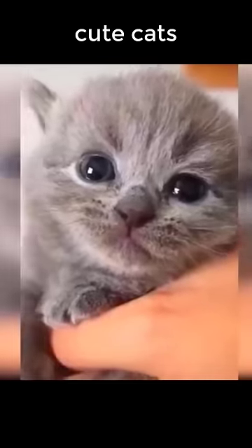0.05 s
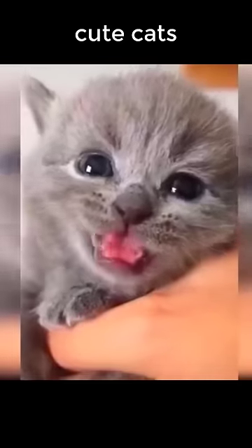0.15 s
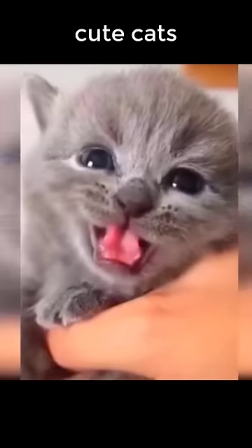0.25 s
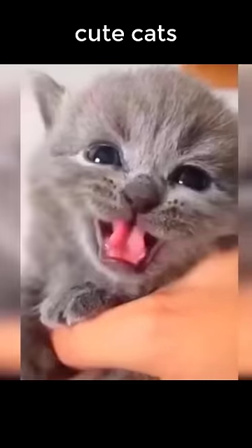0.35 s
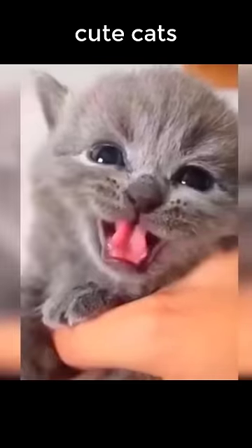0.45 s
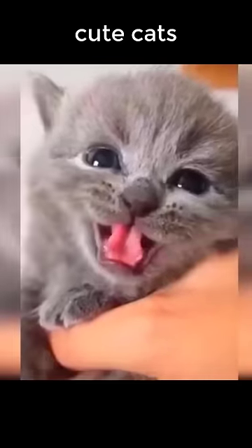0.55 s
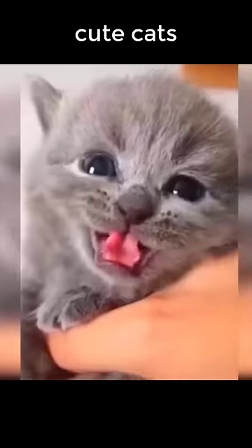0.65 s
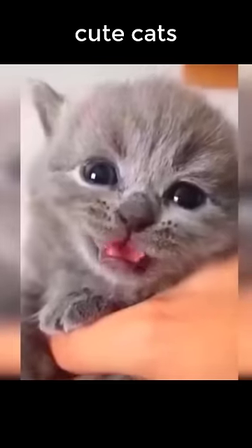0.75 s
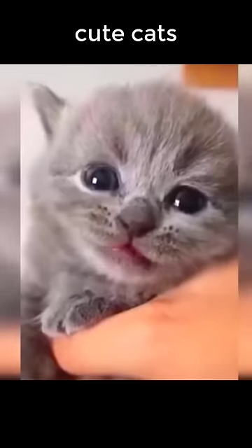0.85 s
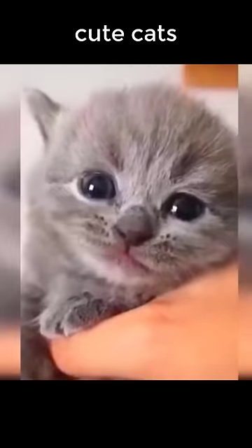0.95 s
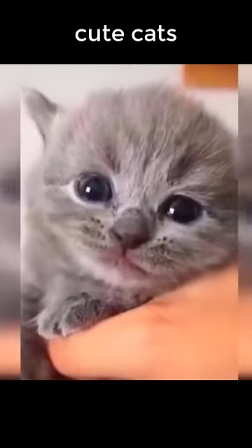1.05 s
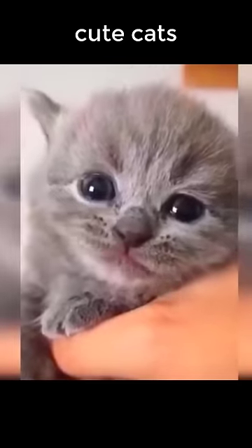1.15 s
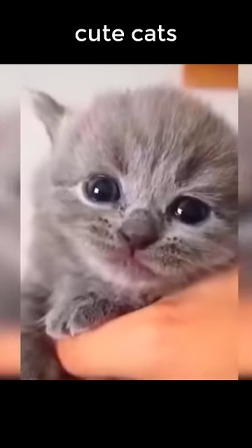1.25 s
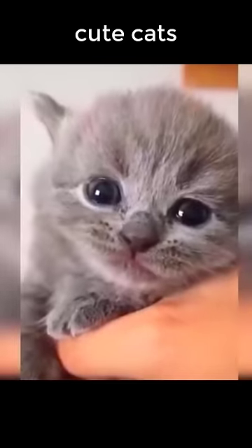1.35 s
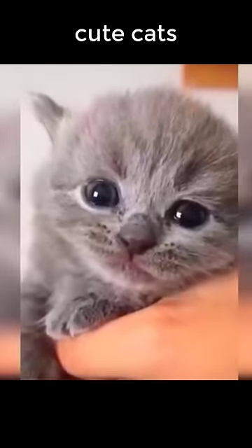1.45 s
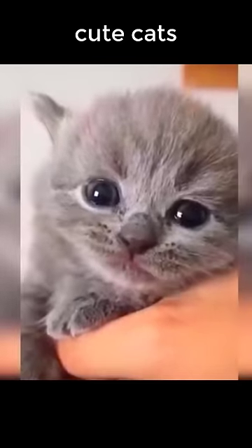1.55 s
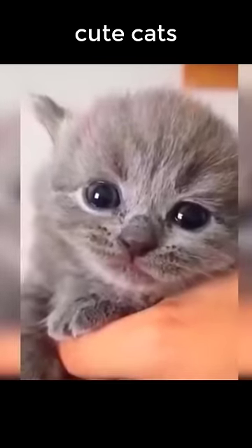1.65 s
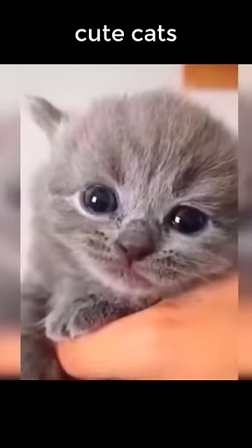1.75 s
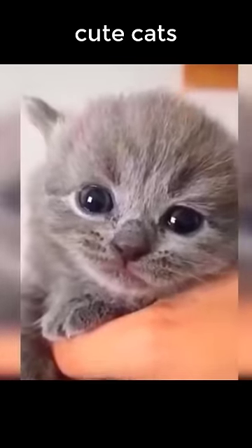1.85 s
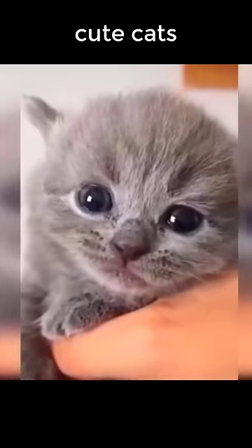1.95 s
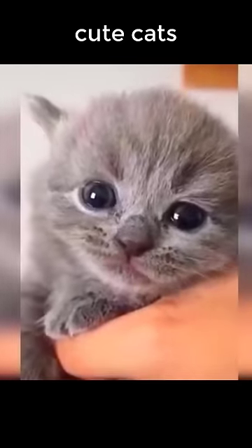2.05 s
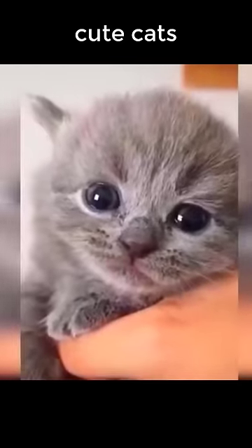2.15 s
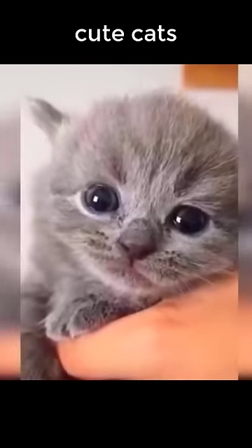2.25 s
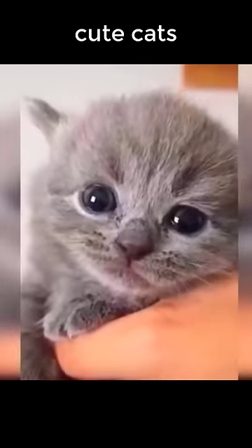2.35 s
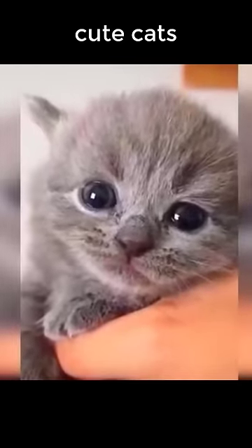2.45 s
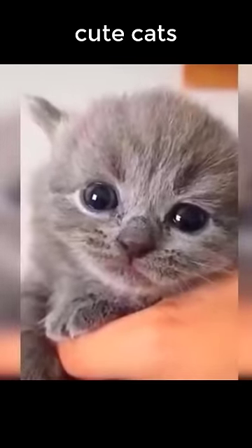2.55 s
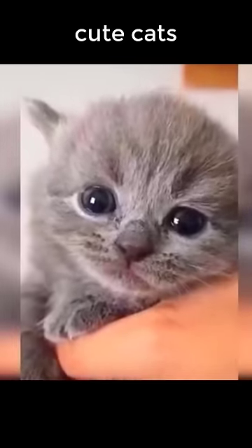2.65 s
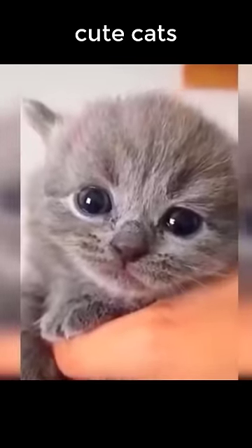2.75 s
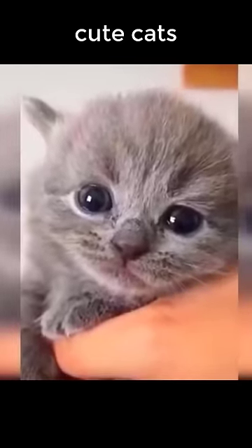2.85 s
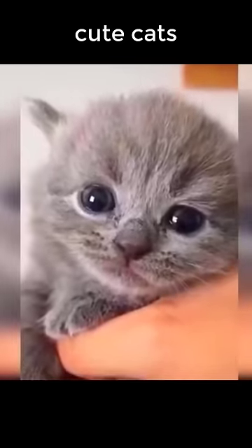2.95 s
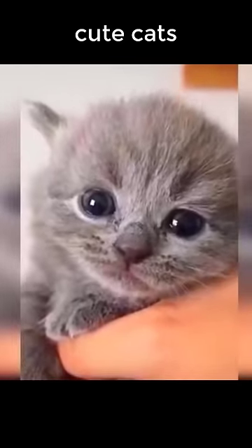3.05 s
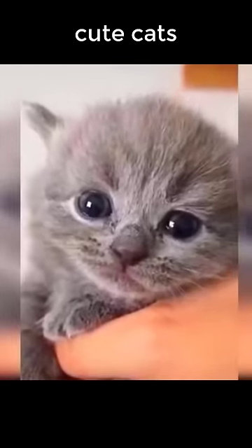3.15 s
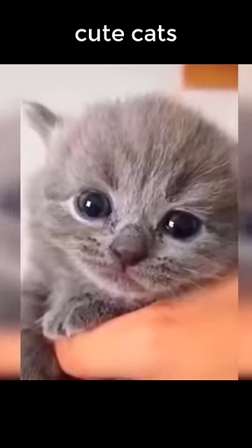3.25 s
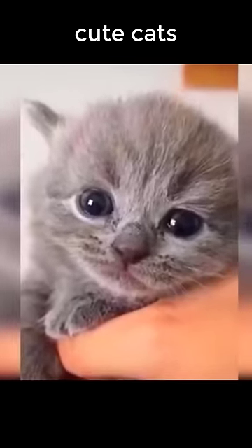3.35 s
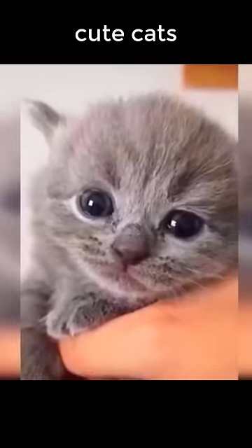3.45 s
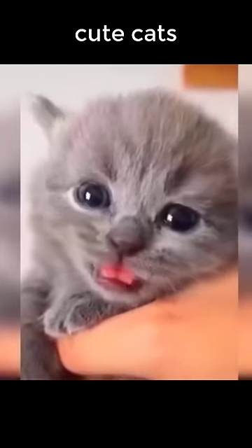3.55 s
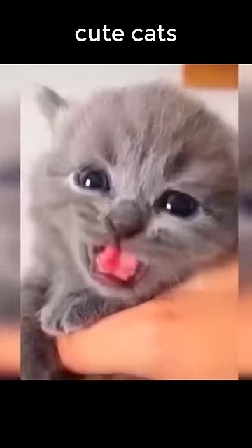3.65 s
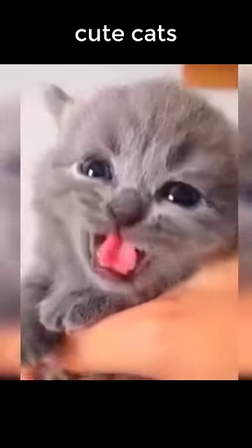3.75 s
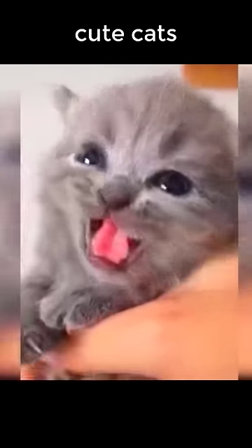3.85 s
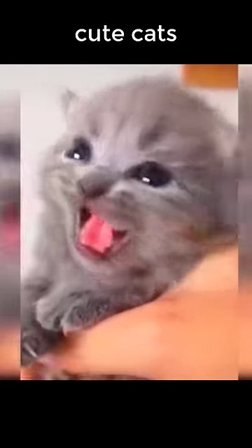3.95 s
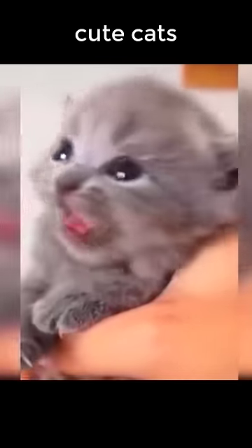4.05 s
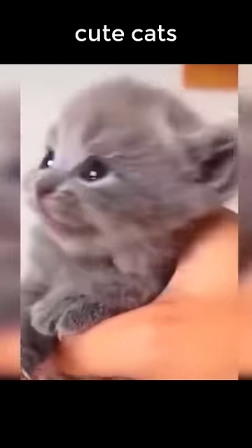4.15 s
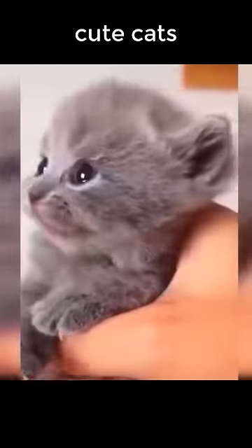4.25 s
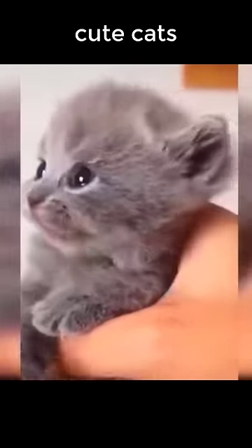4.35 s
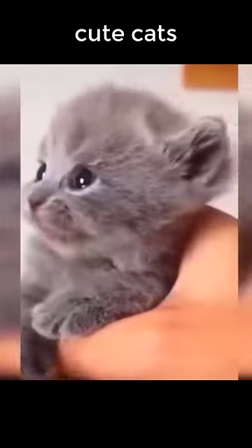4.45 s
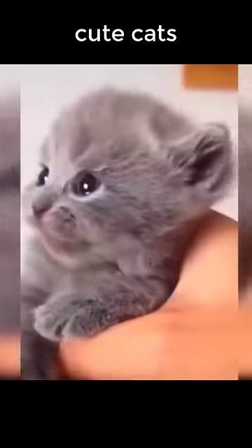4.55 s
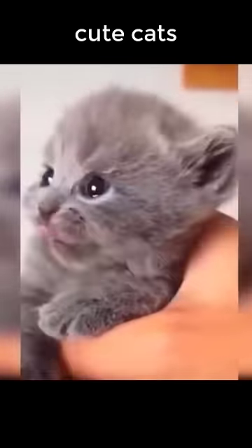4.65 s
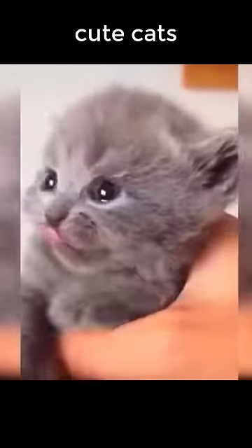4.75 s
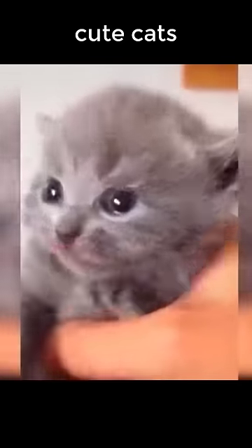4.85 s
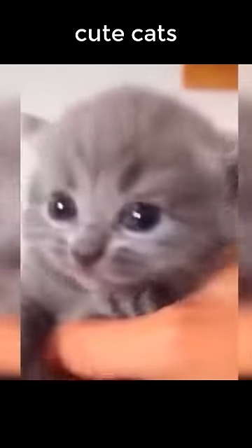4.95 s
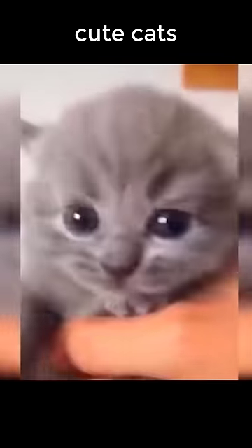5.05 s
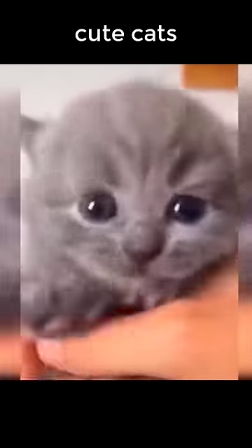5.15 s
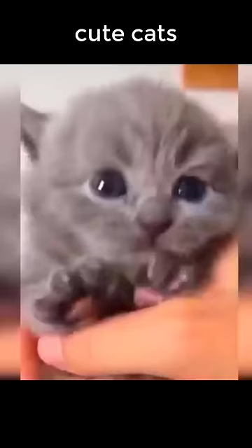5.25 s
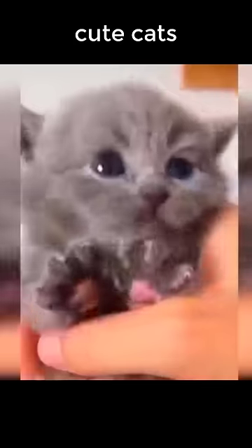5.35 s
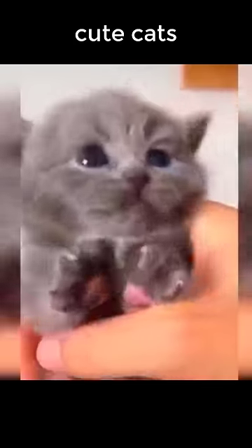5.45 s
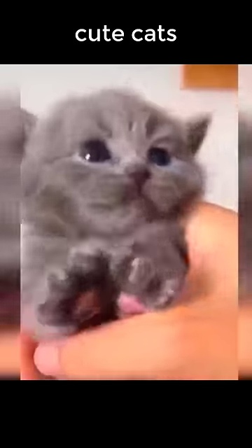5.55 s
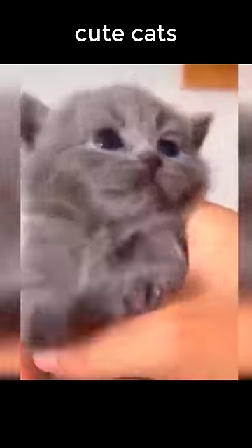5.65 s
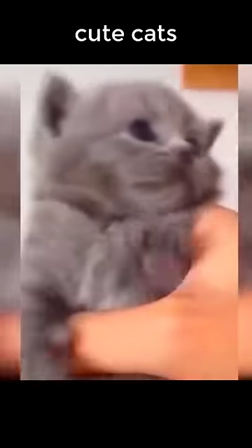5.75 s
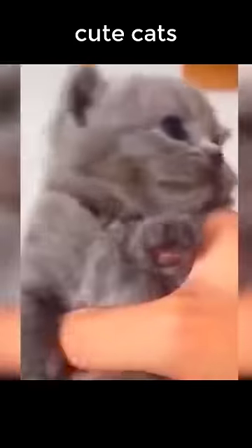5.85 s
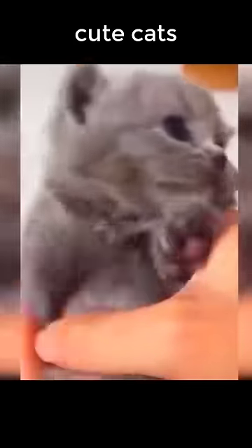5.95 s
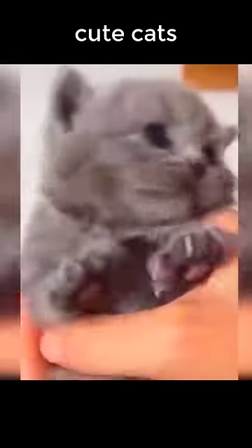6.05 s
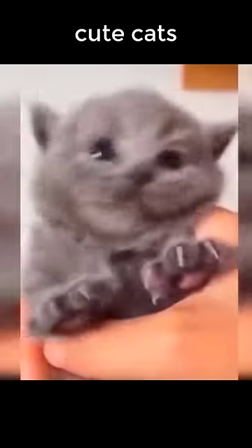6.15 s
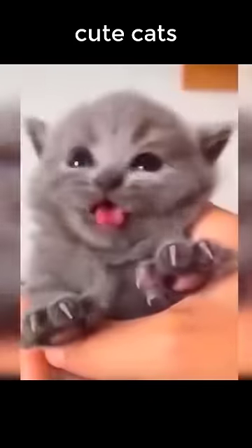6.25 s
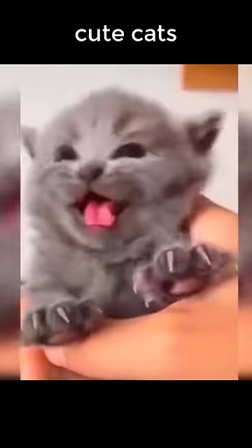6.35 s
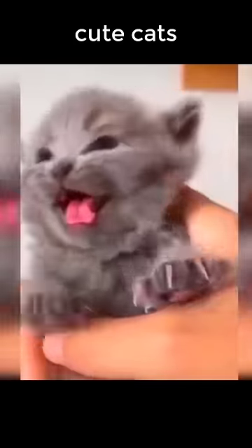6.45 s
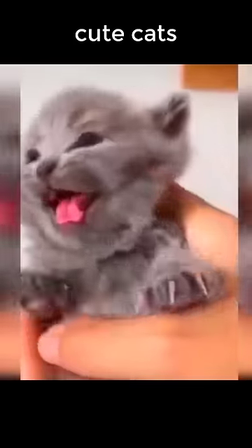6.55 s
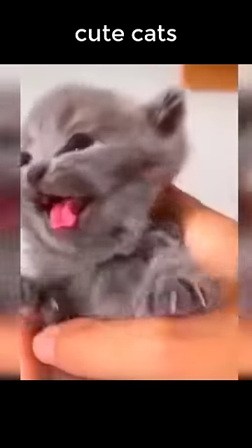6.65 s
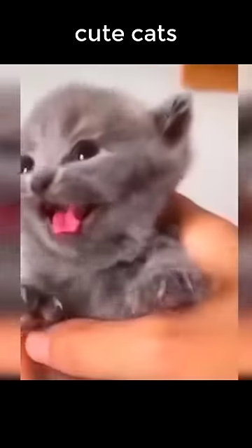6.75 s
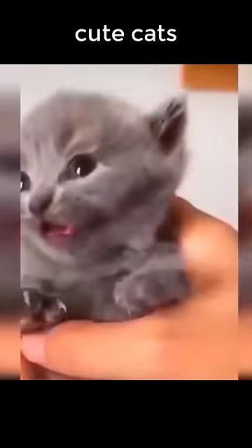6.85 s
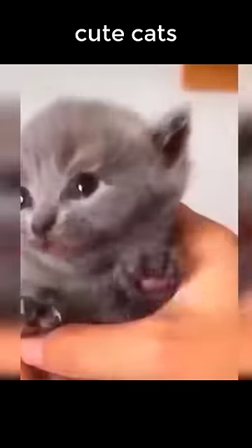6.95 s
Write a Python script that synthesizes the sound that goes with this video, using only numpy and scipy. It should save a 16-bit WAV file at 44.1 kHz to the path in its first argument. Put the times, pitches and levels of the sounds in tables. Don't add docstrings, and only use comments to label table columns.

```python
import sys
import numpy as np
from scipy import signal
from scipy.fft import rfft, irfft, next_fast_len
from scipy.io import wavfile
from scipy.ndimage import uniform_filter1d, minimum_filter1d, map_coordinates

SR = 44100
rng = np.random.default_rng(int(sys.argv[2]) if len(sys.argv) > 2 else 0)


def inscribe(sig):
    pcm = np.round(np.clip(np.atleast_2d(sig).T, -1, 1) * 32767)
    wavfile.write(sys.argv[1], SR, pcm.astype(np.int16))


def gain_from_db(level_db):
    decades = np.asarray(level_db, float) / 20
    return 10 ** decades


N = 308460
T = np.arange(N) / SR
TOP_HZ = 13180


def unit(x):
    return x / np.sqrt(np.mean(x ** 2) + 1e-20)


def along(points, hz):
    f, v = np.transpose(points)
    return np.interp(np.log(hz + 1), np.log(f + 1), v)


def curves(rows, outside=-120):
    s, *cols = np.transpose(rows)
    return [np.interp(T, s, c, outside, outside) for c in cols]


def wobble(rate):
    return map_coordinates(rng.standard_normal(int(N * rate / SR) + 4), [T * rate])


def swell(s, rise, hold, t60):
    return np.clip((T - s) / rise, 0, 1) * gain_from_db(-60 * np.clip(T - s - rise - hold, 0, 2) / t60)


def filtered(x, response):
    m = next_fast_len(len(x) + SR // 2)
    return irfft(rfft(x, m) * response(np.fft.rfftfreq(m, 1 / SR)), m)[:len(x)]


def modes(peaks):
    def response(f):
        total = 0
        for k, (centre, width, db) in enumerate(peaks):
            ring = 1j * f * width / (centre * centre - f * f + 1j * f * width)
            total = total + (-1) ** k * gain_from_db(db) * ring
        return total
    return response


def hiss(spectrum):
    return unit(filtered(rng.standard_normal(N), lambda hz: gain_from_db(along(spectrum, hz))))


def patches(shape, bins, frames):
    field = uniform_filter1d(rng.standard_normal(shape), size=bins, axis=0)
    return unit(uniform_filter1d(field, size=frames, axis=1))


def mottled(x, patchy_db):
    hz, _, z = signal.stft(x, SR, nperseg=512)
    depth_db = patchy_db * np.clip(hz / 6000, .3, 1)[:, None]
    return signal.istft(z * gain_from_db(depth_db * patches(z.shape, 8, 12)), nperseg=512)[1][:N]


# f/Hz, level/dB
HUM = [(53.8, -73), (86.1, -64), (129.2, -76), (172.3, -67.5), (328.4, -68.5), (387.6, -67.5),
       (522.2, -71.5), (775.2, -84.5), (985.1, -72.5), (1642, -79)]
# t/s, rise/s, hold/s, f/Hz, level/dB
WHINE = (2.3, .4, .42, 1642, -70.5)
# f/Hz, level/dB per Hz
RUMBLE = [(30, -22), (55, 11.5), (100, 4.5), (165, 12.5), (255, 5), (340, 8), (480, -14), (750, -74)]
# f/Hz, level/dB per Hz
AIR = [(250, -18), (450, -10.5), (950, -14), (1600, -20), (3500, -19), (5000, -26), (8000, -36.5),
       (13000, -45.5)]


def room_tone():
    out = np.zeros(N)
    for hz, db in HUM:
        tone = np.sin(2 * np.pi * hz * T + 1.02 * wobble(6.8))
        out += np.sqrt(2) * gain_from_db(db + 1.77 * wobble(7)) * tone
    s, rise, hold, hz, db = WHINE
    whine = np.sin(2 * np.pi * hz * T + 1.9 * wobble(16))
    out += gain_from_db(db + 0.92 * wobble(8.8)) * swell(s, rise, hold, 0.24) * whine
    out += gain_from_db(-59.5 + 0.53 * wobble(4.15)) * hiss(RUMBLE)
    return out + gain_from_db(-61.5 + 0.33 * wobble(1.7)) * mottled(hiss(AIR), patchy_db=2.1)


# f/Hz, t60/s
WALLS = [(500, 0.92), (2500, 0.56), (6000, 0.64), (12000, 0.61)]


def walls(x):
    hz, t, z = signal.stft(rng.standard_normal(SR // 2), SR, nperseg=256)
    tail = signal.istft(z * gain_from_db(-60 * t / along(WALLS, hz)[:, None]), SR, nperseg=256)[1]
    late = np.pad(x, (300, 0))
    return signal.fftconvolve(late, tail / np.linalg.norm(tail))[:N]


# t/s, level/dB
BRUSH = [
    (1.7, -72),
    (1.718, -54),
    (1.76, -45),
    (1.984, -77),
    (2.0, -81),
]
# f/Hz, level/dB per Hz
CLOTH = [(1180, -50), (2300, -11), (3100, 1), (3770, -5), (6280, 3), (7000, -3), (10400, 0.5),
         (13000, -3.5)]


def cloth():
    return gain_from_db(curves(BRUSH)[0] + 1.0 * wobble(70)) * mottled(hiss(CLOTH), patchy_db=2.5)


# t/s, t60/s, f/Hz,
# width/Hz, level/dB
BUMPS = [(.16, 0.21, 220, 300, -52), (.349, 0.066, 3300, 900, -42), (.872, 0.16, 620, 199, -45.5),
         (.91, 0.23, 606, 258, -54), (.872, 0.22, 1970, 1200, -50), (.872, 0.43, 8500, 9500, -54),
         (.32, 0.048, 4900, 695, -49), (1.035, .055, 3120, 2000, -52), (1.04, 0.22, 2160, 300, -58.5),
         (1.54, 0.1, 880, 200, -57), (2.0, .6, 200, 250, -52.5), (2.03, 0.47, 1500, 3000, -62.5),
         (2.27, 0.43, 4400, 500, -61.5), (2.61, 0.16, 1310, 700, -60.5), (4.32, 0.27, 4200, 3000, -60),
         (4.385, .2, 2260, 400, -57), (5.05, .04, 7000, 7700, -68), (5.368, 0.044, 3200, 2400, -52.5),
         (5.954, 0.15, 1230, 700, -56), (5.981, 0.043, 2600, 1600, -60), (6.42, 0.31, 202, 350, -51.5),
         (6.67, 0.42, 344, 500, -53.5), (.295, .08, 3030, 2000, -56.5), (4.31, 0.25, 11500, 2500, -72.5)]


def bumps():
    out, t = np.zeros(N + SR), np.arange(SR // 2) / SR
    for s, t60, hz, width_hz, db in BUMPS:
        band, rise = modes([(hz, width_hz, 0)]), 0.08 * t60
        puff = unit(filtered(rng.standard_normal(len(t)), lambda f: band(f) ** 2))
        fade = gain_from_db(db - 60 * np.maximum(t - rise, 0) / t60)
        out[round(s * SR):][:len(t)] += puff * np.minimum(t / rise, 1) * fade
    return out[:N] * gain_from_db(2.9 * wobble(90))


# t/s, length/s, ring level/dB, rattle over ring/dB
SWINGS = [(-.03, 0.16, -56, 3.5), (0.12, 0.43, -46.5, -1.5), (.36, .07, -52, -3), (.62, 0.18, -54, 3),
          (.92, 0.13, -64, 2), (1.045, 0.13, -57, -3.5), (3.242, 0.081, -61, 0), (3.382, 0.11, -58.5, 2.5),
          (3.632, 0.17, -45.5, -8.5), (3.88, 0.37, -55, -1.2), (6.382, .07, -54, 6),
          (4.486, 0.26, -53.5, -2.5), (4.875, 0.02, -61, -4), (5.192, 0.081, -58.5, 0.5),
          (5.39, 0.2, -47, -5), (5.844, 0.25, -49.5, -1), (6.103, .17, -54.5, 3.5), (6.28, 0.21, -47, -4),
          (5.76, 0.054, -58.5, -2), (6.618, 0.21, -54.5, 2.5)]
# t/s, peak level/dB, bright part level/dB, shiver afterwards under the peak/dB
CLINKS = [(0.0532, -47, .5, 16), (0.1457, -35.5, -13, 21), (.1649, -31, -8, 28), (0.2429, -33, -11, 14),
          (0.2633, -25.5, -14, 14), (.2797, -15.5, -10.5, 19), (0.312, -28, -2, 30.5),
          (0.3201, -28, 5.5, 17), (.332, -35, -3, 25), (0.879, -39, 5, 21), (3.2473, -44.5, -20, 16),
          (3.408, -47.5, -13, 16), (3.446, -51, 3, 8), (3.5027, -45.5, -11, 18), (3.6712, -38, -14, 12),
          (3.7664, -36.5, -29, 10.5), (4.5285, -40, -13, 14), (4.6675, -44, -13, 2),
          (4.6911, -35.5, -14, 3.5), (4.744, -33, -4.5, 16), (5.383, -28.5, 1, 17), (5.458, -37, -16, 26),
          (5.547, -26, -15, 16), (5.582, -40, -1, 24), (5.838, -37, -1, 21), (5.8967, -27.5, -14, 14),
          (5.994, -26.5, -16, 23), (6.067, -28, -8, 24), (6.136, -40, -3, 28), (6.3, -29, -4, 22)]
# f/Hz, width/Hz, level/dB
BELL = [(6060, 75, 0), (6450, 130, -11)]
# f/Hz, width/Hz, level/dB
BEADS = [(7000, 500, -0.5), (7700, 260, -1), (8300, 530, -8.5), (10000, 2000, -37), (12300, 1500, -24)]


def shivering():
    ring, rattle = np.zeros((2, N))
    for s, hold, db, rattle_db in SWINGS:
        shape = gain_from_db(db) * swell(s, 0.026, hold, 0.24)
        ring += shape
        rattle += gain_from_db(rattle_db) * shape
    for s, db, bright_db, under_db in CLINKS:
        shape = gain_from_db(db - under_db) * swell(s, 0.018, 0, 0.11)
        ring += shape
        rattle += gain_from_db(0.84 * bright_db - 1.5) * shape
    return ring, rattle


def shiver(ring, rattle):
    knocks = (rng.random(N) < 6000 / SR) * rng.standard_normal(N) * gain_from_db(0.59 * rng.exponential(size=N))
    body = unit(knocks * gain_from_db(2.2 * wobble(40))) * ring * gain_from_db(-2.5)
    out = gain_from_db(16.5) * filtered(body, modes(BELL))
    for mode in BEADS:
        part = unit(rng.permutation(knocks) * gain_from_db(3.3 * wobble(45))) * rattle
        out += gain_from_db(2.5) * filtered(part, lambda f: modes([mode])(f) / (1 + (f / 11500) ** 6))
    return out


def clinks(rattle):
    ring, dry, t = np.zeros(N), np.zeros(N), np.arange(SR // 20) / SR
    for s, db, bright_db, _ in CLINKS:
        gather = (t / [[.003], [.002]]) ** 1.07
        thin_out = gain_from_db(-60 * t / [[.035], [.022]])
        cluster = rng.standard_normal((2, len(t))) * thin_out * gather
        start = round((s - .002) * SR)
        ring[start:][:len(t)] += gain_from_db(db - 3.0) * cluster[0]
        dry[start:][:len(t)] += gain_from_db(db + bright_db + 2.5) * cluster[1]
    ticks = (rng.random(N) < 40 / SR) * rng.standard_normal(N)
    dry += gain_from_db(25.5) * rattle * ticks
    out = gain_from_db(19.5) * filtered(ring, modes(BELL))
    return out + gain_from_db(5.0) * filtered(dry, lambda f: modes(BEADS)(f) / (1 + (f / 12000) ** 4))


def trinket():
    ring, rattle = shivering()
    out = shiver(ring, rattle) + clinks(rattle)
    return filtered(out, lambda hz: 1 / (1 + (5400 / (hz + 1)) ** 8))


def ring_db(hz, centre_hz, width_hz):
    return 20 * np.log10(centre_hz ** 2 / np.abs(centre_hz ** 2 - hz ** 2 + 1j * hz * width_hz))


# t/s, f/Hz
PITCH = [
    [(.365, 1148), (.535, 1313), (.6, 1317), (.708, 1300), (.76, 1261), (.865, 1159), (.93, 1143),
     (1.018, 1042), (1.045, 1098)],
    [(3.793, 1149), (3.915, 1356), (4.0, 1377), (4.128, 1318), (4.2, 1266), (4.29, 1159), (4.33, 1037),
     (4.368, 751), (4.385, 965)],
    [(6.436, 1214), (6.5, 1285), (6.54, 1336), (6.646, 1431), (6.688, 1472), (6.794, 1428), (6.841, 1416),
     (6.929, 1377), (6.995, 1258)],
]
# t/s, level/dB, mouth resonance f/Hz (rises as it opens), effort/dB per octave
JAW = [
    [(.365, -44.5, 3600, -0.7), (.41, -43, 4010, 0.8), (.496, -44, 4080, 1.8), (.621, -44.5, 3746, 2.5),
     (.679, -44, 3320, 3), (.82, -43.4, 2850, 1.1), (.956, -46, 2010, 1), (1.025, -49.5, 1970, 0.8),
     (1.045, -73, 1850, -5)],
    [(3.793, -41.5, 3880, -1.7), (3.85, -43, 3860, 2), (3.91, -42.5, 4080, 2.55), (4.038, -42, 3540, 3),
     (4.085, -45, 3150, 4.5), (4.255, -43.5, 2560, 1.3), (4.318, -47, 2090, -1.5), (4.358, -53, 2400, -0.5),
     (4.385, -69, 2300, -0.5)],
    [(6.436, -40, 2190, -15), (6.447, -45.5, 2680, -9), (6.464, -44, 2720, 0.4), (6.522, -46, 3770, 0.8),
     (6.631, -45.5, 3985, 3), (6.701, -45.5, 3710, 3.5), (6.847, -46, 3330, 4.5), (6.946, -48, 3040, 4.5),
     (6.995, -45, 3020, -0.5)],
]
# 4th overtone level/dB, 5th level/dB, higher ones level/dB
TURN = [(0, 1, 0), (-3.1, -1, -0.8), (-6, 5.5, 1.7)]
# f/Hz, level/dB
FOLDS = [(1000, 0.9), (1500, 3.5), (2500, -9.5), (4000, -4), (6000, -1), (7500, -19), (10000, -4.5),
         (13000, 1)]
# f/Hz, level/dB per Hz
BREATH = [(1500, -33), (3000, -6), (4500, -11), (8000, -18.5), (13000, -16.5)]


def mew_pitch(glide, start, on):
    s, hz = np.transpose(glide)
    snap = 0.705 * np.exp(-np.abs(T - start) / 0.00053)
    tremor = 0.0018 * wobble(40) + 0.002 * wobble(14)
    pitch = uniform_filter1d(np.interp(T, s, hz), size=1000) * (1 + tremor + snap)
    return pitch[on] * (1 - 0.055 * np.exp(-(T[on] - start) / .02))


def kitten():
    out, flutter = np.zeros(N), wobble(220)
    for glide, rows, turn_db in zip(PITCH, JAW, TURN):
        start = rows[0][0]
        on = slice(round(start * SR), round(rows[-1][0] * SR))
        age = T[on] - start
        pitch = mew_pitch(glide, start, on)
        phase = 2 * np.pi * np.cumsum(pitch) / SR
        level, mouth, effort = [c[on] for c in curves(rows)]
        slack = .016 + np.clip(-49 - level, 0, 8) * .07
        muffle = 4.5 * np.minimum(mouth - 2880, 0) / 1000
        throat = 8560 - 0.24 * mouth
        for k in range(1, 14):
            f = k * pitch
            db = level + effort * np.log2(k) + along(FOLDS, f)
            db += (k > 3) * turn_db[min(max(k - 4, 0), 2)]
            db += muffle * (k > 5) + (0.6 if k < 6 else 2.2) * wobble(30)[on]
            db += ring_db(f, mouth, 360) + ring_db(f, throat, 1290)
            tone = np.sin(k * (phase + slack * flutter[on]) - 0.35 * k * k)
            onset = np.clip(age / (0.00031 * k), 0, 1)
            out[on] += np.sqrt(2) * gain_from_db(db) * tone * (f < TOP_HZ) * onset
        gasp_db = 14 * np.exp(-age / 0.05)
        breath_db = level + .6 * muffle - 24.5 + 1.66 * effort + gasp_db
        out[on] += gain_from_db(breath_db) * (1 + np.cos(phase)) * hiss(BREATH)[on]
    return out


def scene():
    near, rattle = kitten() + bumps(), trinket()
    echo = gain_from_db(-22.5) * walls(near) + gain_from_db(-9.5) * walls(rattle)
    mono = near + rattle + echo + cloth() + room_tone()
    return np.array([mono, mono])


# f/Hz, level/dB
MASK = [(1000, 38), (2500, 39), (4500, 36), (7000, 27), (10000, 22), (13000, 18)]
# f/Hz, level/dB per bin
QUIET = [(11000, -124), (12200, -117), (13000, -115)]


def masked(x):
    hz, _, z = signal.stft(x, SR, window="cosine", nperseg=2048)
    power = uniform_filter1d(np.abs(z) ** 2, size=7, axis=0)
    strongest = -minimum_filter1d(-power, size=79, axis=0, origin=7)
    limit = strongest * gain_from_db(-along(MASK, hz)[:, None]) ** 2 + gain_from_db(along(QUIET, hz)[:, None]) ** 2
    keep = power > limit * gain_from_db(3 * patches(z.shape, 16, 2)) ** 2
    return signal.istft(z * keep, window="cosine", nperseg=2048)[1][:N]


# t/s, f/Hz, width/Hz, level/dB
SWAPS = [(.755, 11500, 900, -59), (2.105, 5700, 1200, -78), (2.385, 11500, 2000, -86),
         (3.265, 8000, 600, -84), (3.915, 10700, 900, -58), (3.915, 12100, 900, -56),
         (4.189, 7700, 1400, -53), (4.19, 12700, 800, -66), (5.025, 5540, 1190, -82),
         (6.625, 11500, 900, -54), (6.765, 10000, 960, -51), (6.971, 7120, 2020, -53),
         (6.97, 11200, 1393, -60)]


def swapped():
    out, window = np.zeros((2, N + SR)), np.hanning(2048)
    for s, hz, width_hz, db in SWAPS:
        for side in out:
            noise = filtered(rng.standard_normal(2048), lambda f: np.abs(f - hz) < width_hz / 2)
            side[round(s * SR) - 1024:][:2048] += gain_from_db(db) * unit(noise) * window
    return out[:, :N]


def roll_off(x):
    return signal.sosfilt(signal.butter(12, 13670, fs=SR, output="sos"), x)


def record(dry):
    cut = filtered(masked(dry[0]), lambda hz: np.clip((TOP_HZ - hz) / 120, .01, 1))
    return roll_off(cut + swapped())


dry = scene()
out = record(dry)
inscribe(out)
```